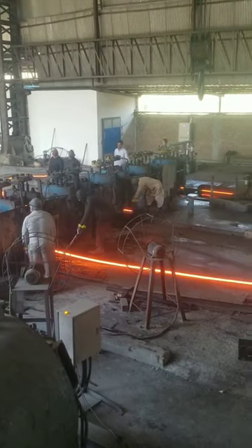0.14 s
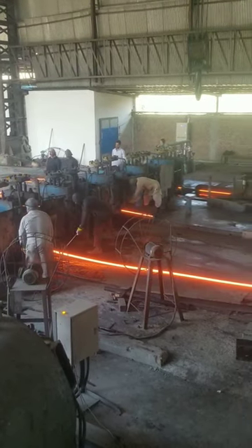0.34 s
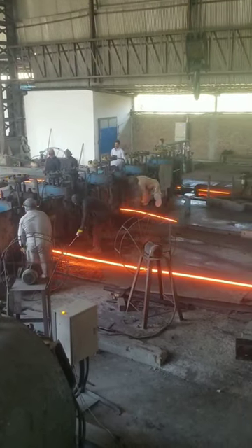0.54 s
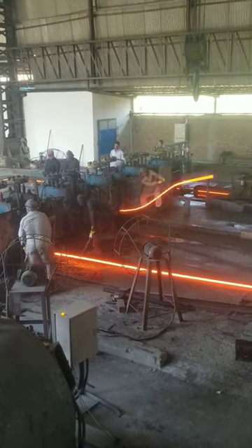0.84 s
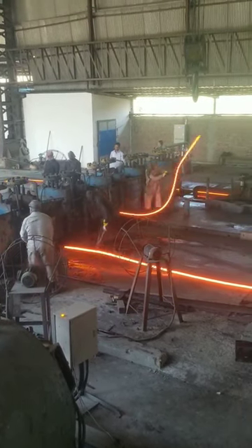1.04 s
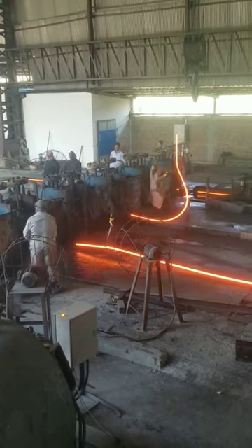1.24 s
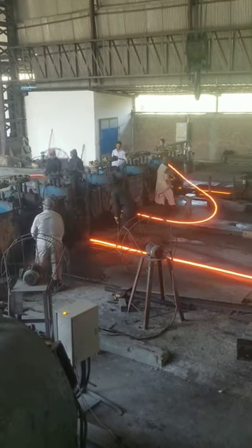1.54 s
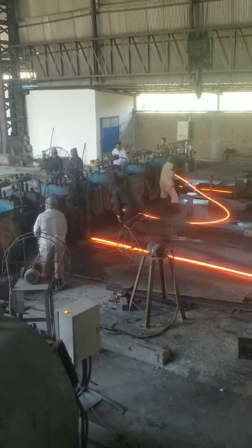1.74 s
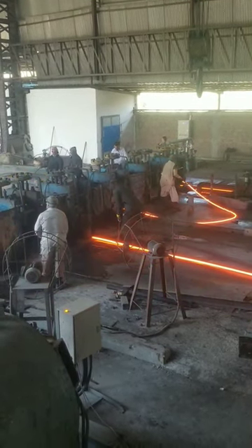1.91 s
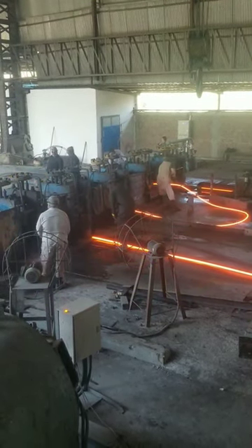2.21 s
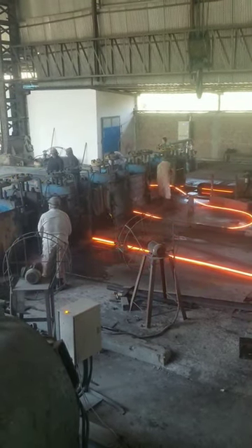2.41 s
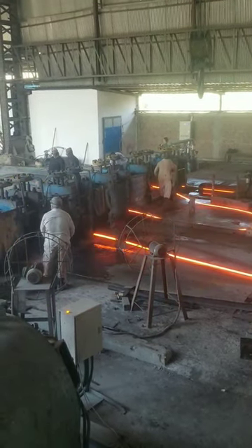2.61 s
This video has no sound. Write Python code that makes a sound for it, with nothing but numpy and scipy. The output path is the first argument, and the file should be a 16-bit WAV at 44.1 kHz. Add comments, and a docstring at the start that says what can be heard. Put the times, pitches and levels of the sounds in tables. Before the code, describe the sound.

A rolling mill roars without pause in a large industrial shed, low gear drone wavering underneath; an early dull thump, then two faint clinks and short scrapes, a softer knock later, heard by a stereo microphone at some distance.

```python
"""A rolling mill roars in a large steel shed, heard at two ports alike in the bass and apart in the treble.
From the start drifting gear sines stand over noise beds: rumble, rush, hiss, a howl and a rasp; steel modes
rattle at random. At 0.32 s a damped low ring thumps and the level dips briefly; from 0.7 to 1 s two clinks
strike the steel modes and two swells of rough noise scrape. A softer, higher thump comes near 2 s, and
the first gear tone surges at the end."""
import sys
import numpy as np
from scipy import signal
from scipy.fft import rfft, irfft, next_fast_len
from scipy.io import wavfile
from scipy.ndimage import uniform_filter1d, map_coordinates

SR = 44100
rng = np.random.default_rng(int(sys.argv[2]) if len(sys.argv) > 2 else 0)


def dump_mix(stems):
    """Bounce the given channels to the path in sys.argv[1] as a 16-bit WAV at rate SR."""
    frames = np.atleast_2d(stems).T  # one column per channel
    limited = np.clip(frames, -1, 1)  # hard clip at full scale
    pcm = np.round(limited * 32767).astype(np.int16)
    wavfile.write(sys.argv[1], SR, pcm)


def decibels_to_gain(level_db):
    """Convert a level in decibels to a linear amplitude gain (20 dB per decade)."""
    exponent = np.asarray(level_db, float) / 20
    return 10 ** exponent


N = 121716


def unit(x):
    """Scale to rms 1."""
    return x / np.sqrt(np.mean(x ** 2) + 1e-20)


def along(points, hz):
    """Read a curve of (f/Hz, value) points on a log frequency axis."""
    f, value = np.transpose(points)
    return np.interp(np.log(hz + 1), np.log(f + 1), value)


def curves(rows):
    """One automation curve, sample by sample, for each column after the time."""
    s, *columns = np.transpose(rows)
    return [np.interp(np.arange(N) / SR, s, column) for column in columns]


def wobble(rate):
    """A smooth random curve through normal random knots, rate knots a second."""
    return map_coordinates(rng.standard_normal(400), [np.arange(N) * rate / SR])


def filtered(x, response):
    """Shape the spectrum of x by a response of frequency."""
    m = next_fast_len(N + SR // 2)
    return irfft(rfft(x, m) * response(np.fft.rfftfreq(m, 1 / SR)), m)[..., :N]


def patches(shape, tall, wide):
    """A random field of rms 1, smoothed into blobs of tall by wide cells."""
    field = uniform_filter1d(rng.standard_normal(shape), size=tall, axis=0)
    return unit(uniform_filter1d(field, size=wide, axis=1))


def noise(spectrum, patchy_db, streaky_db):
    """Two coloured noises of rms 1 with short broad patches and long narrow streaks of random gain."""
    pair = rng.standard_normal((2, N))
    for size, blob, db in ((512, (6, 5), patchy_db), (2048, (2, 6), streaky_db)):
        z = signal.stft(pair, nperseg=size)[2]
        gain = decibels_to_gain(db * patches(z.shape[1:], *blob))
        pair = signal.istft(z * gain, nperseg=size)[1][:, :N]
    return unit(filtered(pair, lambda hz: decibels_to_gain(along(spectrum, hz))))


def hall(dry):
    """The shed answers with decaying noise, one unrelated tail for each of two channels."""
    t60_s, wet_db = 0.63, -6.5
    t = np.arange(SR) / SR
    tail = rng.standard_normal((2, SR)) * decibels_to_gain(-60 * t / t60_s)
    wet = signal.fftconvolve(dry[None], tail / np.linalg.norm(tail[0]), axes=1)[:, :N]
    return dry[:N] + decibels_to_gain(wet_db) * wet


# single blows on the steel [t/s, level/dB before the modes add up]
CLINK_BLOWS = [(.715, -35), (.83, -33)]
# ringing modes of steel rails and bars [f/Hz before detuning, level/dB re the blow, t60/s]
STEEL_MODES = [(885, 1, 0.099), (1412, 5.5, 0.12), (1930, 3, 0.046), (2750, 0.5, 0.095), (3120, -13, 0.042),
               (3223, 2.5, 0.054), (3570, -20, 0.055), (4350, -16, .05)]


def steel():
    """Clinks and a dense random rattle ring the same damped modes, each blow detuned, into the hall."""
    rattles, rattle_db = 260, -40
    detune, scatter_db, attack_s = 0.03, 1, 0.0043
    out, t = np.zeros(N + SR), np.arange(SR // 8) / SR
    blows = [(u * N / SR, rattle_db) for u in rng.uniform(size=rattles)]
    blows += CLINK_BLOWS
    hz, level_db, t60 = np.transpose(STEEL_MODES)[:, :, None]
    for s, db in blows:
        level_shift, pitch_shift = rng.uniform(-0.79, 1, (2, len(STEEL_MODES), 1))
        decay = decibels_to_gain(level_db + scatter_db * level_shift - 60 * t / t60)
        ring = decay * np.sin(2 * np.pi * hz * (1 + detune * pitch_shift) * t)
        out[round(s * SR):][:len(t)] += decibels_to_gain(db) * ring.sum(axis=0) * (1 - np.exp(-t / attack_s))
    return hall(out)


# rough scrapes of a bar on the floor plates [t/s, level/dB at the height of the swell, half length/s to 1/e]
SCRAPE_SWELLS = [(0.734, -28.5, 0.023), (.955, -29, 0.03)]
# colour of the scrape [f/Hz, relative level/dB per Hz]
SCRAPE_COLOUR = [(700, -25), (1100, -3), (1500, 2), (2300, 4), (3200, -30.5)]


def scrapes():
    """Friction as short bell-shaped swells of mid noise, roughened by a fast random level."""
    t = np.arange(N) / SR
    swell = sum(decibels_to_gain(db) * np.exp(-((t - s) / half) ** 2) for s, db, half in SCRAPE_SWELLS)
    roughness = decibels_to_gain(2.8 * wobble(90.4))
    return swell * roughness * noise(SCRAPE_COLOUR, patchy_db=5.0, streaky_db=1.0)


# dull thumps [t/s, level/dB before the soft rise, f/Hz]
THUMP_BLOWS = [(.318, -6, 474), (1.97, -11, 531)]


def thumps():
    """A bar knocks a guide: each blow is one damped low ring with a soft rise."""
    rise_s, t60_s = 0.0084, 0.13
    out = np.zeros(N)
    for s, db, hz in THUMP_BLOWS:
        t = np.maximum(np.arange(N) / SR - s, 0)
        out += decibels_to_gain(db - 60 * t / t60_s) * (1 - np.exp(-t / rise_s)) * np.sin(2 * np.pi * hz * t)
    return out


# colour of the hiss [f/Hz, relative level/dB per Hz]
HISS_COLOUR = [(2350, -31.5), (4000, -14), (4520, -1.5), (5240, -0.5), (5720, 1.5), (6850, -9.5),
               (7970, -20), (9990, -10.5), (11700, -12), (14900, -27)]


def hiss(shudder_db):
    """Cooling water as a quiet bed of high noise at one mean level with a slight flutter."""
    level_db = -43.5 + shudder_db + 0.38 * wobble(36.2)
    return decibels_to_gain(level_db) * noise(HISS_COLOUR, patchy_db=1.4, streaky_db=2.0)


# rides of the howl and the rasp, before their trims [t/s, howl level/dB, rasp level/dB]
RESONANCE_RIDES = [(0, -34, -38), (.36, -35.5, -39), (.55, -31.5, -38), (1.0, -37, -36), (1.25, -32.5, -33),
                   (1.6, -32, -35), (1.9, -33, -37), (2.1, -33, -38), (2.42, -33, -36), (2.58, -38, -33.5),
                   (2.76, -31, -38)]
# colour of the howl near 900 Hz [f/Hz, relative level/dB per Hz]
HOWL_COLOUR = [(780, -30), (870, -5), (897, 10), (930, -2), (1000, -32)]
# colour of the rasp near 3.2 kHz [f/Hz, relative level/dB per Hz]
RASP_COLOUR = [(2600, -10), (3050, 5), (3250, 3), (3400, -7), (3700, -34)]


def resonances():
    """Two narrow noise bands stand out of the roar: a howl and a fluttering rasp."""
    howl_trim_db, rasp_trim_db = -4.5, -3
    howl_db, rasp_db = curves(RESONANCE_RIDES)
    howl = decibels_to_gain(howl_db + howl_trim_db) * noise(HOWL_COLOUR, patchy_db=0.8, streaky_db=3.5)
    rasp_level = decibels_to_gain(rasp_db + rasp_trim_db + 1.2 * wobble(39.5))
    return howl + rasp_level * noise(RASP_COLOUR, patchy_db=0.5, streaky_db=1.5)


# ride of the rush, before its trim [t/s, level/dB]
RUSH_RIDE = [(0.0, -24), (0.2, -25), (0.73, -23.5), (1.51, -23.5), (2.26, -25), (2.66, -25), (2.76, -22.5)]
# colour of the rush [f/Hz, relative level/dB per Hz]
RUSH_COLOUR = [(320, -30), (550, -3), (686, -4.5), (881, -2), (1010, -6.5), (1370, -6), (1490, -8),
               (1620, -8), (2020, -13.5), (3150, -12.5), (4010, -23), (4520, -22), (5000, -28), (6500, -57),
               (11000, -120)]


def rush(shudder_db):
    """The roll stands as a bed of mid noise that follows its ride and shudders."""
    trim_db = 2.5
    (ride_db,) = curves(RUSH_RIDE)
    level_db = ride_db + trim_db + shudder_db + 0.66 * wobble(34.76)
    return decibels_to_gain(level_db) * noise(RUSH_COLOUR, patchy_db=1.91, streaky_db=1.76)


# ride of the rumble, before its trim [t/s, level/dB]
RUMBLE_RIDE = [(0.0, -21), (0.16, -26), (0.2, -21.5), (0.47, -23), (0.48, -20.5), (0.67, -23.5),
               (0.74, -20.5), (0.91, -23), (0.93, -21), (1.52, -21), (1.94, -25), (2.02, -18.5),
               (2.04, -23.5), (2.38, -20.5), (2.64, -24.5), (2.76, -19.5)]
# colour of the rumble [f/Hz, relative level/dB per Hz]
RUMBLE_COLOUR = [(13, -56.5), (22, -27.5), (54, -27), (96, -13.5), (134, -14), (204, -3.5), (277, 1.5),
                 (302, -2), (344, -3), (392, -5.5), (447, -4), (700, -18.5), (910, -38), (1540, -120)]


def rumble(shudder_db):
    """A broad bed of low noise that swells, sinks and shudders."""
    trim_db = 4.5
    (ride_db,) = curves(RUMBLE_RIDE)
    level_db = ride_db + trim_db + shudder_db + 1.0 * wobble(24.8)
    return decibels_to_gain(level_db) * noise(RUMBLE_COLOUR, patchy_db=0.9, streaky_db=1.5)


def roar():
    """Rumble, rush and hiss share a slight shudder; the two resonances stand out."""
    shudder_db = 0.14 * wobble(21.7)
    return rumble(shudder_db) + rush(shudder_db) + hiss(shudder_db) + resonances()


def tone(hz, db, blur_hz, waver_db):
    """A sine of wandering pitch, drawn twice with its own phase and level waver."""
    turns = np.cumsum(hz + blur_hz * wobble(29.86)) / SR
    pair = []
    for phase in rng.uniform(0, 2 * np.pi, 2):
        level = np.sqrt(2) * decibels_to_gain(db + waver_db * wobble(16))  # a sine's peak is root 2 over its rms
        pair.append(level * np.sin(2 * np.pi * turns + phase))
    return np.array(pair)


# ride of the gear mesh tone [t/s, level/dB rms before the waver]
MESH_RIDE = [(0.0, -35), (0.11, -16), (0.16, -34), (0.63, -25.5), (0.67, -45), (0.72, -20.5), (1.14, -18.5),
             (1.3, -40), (1.34, -15), (1.44, -29), (1.46, -15), (1.8, -28), (1.85, -16.5), (2.66, -25),
             (2.68, -19.5), (2.76, -11.5)]
# ride of the pinion tone [t/s, level/dB rms before the waver]
PINION_RIDE = [(0.0, -27), (0.05, -20.5), (0.13, -35), (0.45, -23), (0.48, -31), (1.54, -22.5), (1.56, -35),
               (1.69, -24.5), (1.92, -28), (1.99, -15.5), (2.08, -25.5), (2.76, -36)]
# ride of the coupling tone [t/s, level/dB rms before the waver]
COUPLING_RIDE = [(0.0, -42), (0.08, -19), (0.16, -28), (1.18, -23.5), (1.24, -39), (1.31, -16), (1.44, -30),
                 (1.49, -19), (1.71, -29), (2.12, -25), (2.74, -30.5), (2.76, -30.5)]
# weaker drive tones [f/Hz before the blur, level/dB rms before the waver, blur/Hz]
DRIVE_TONES = [(33, -49, 2.5), (119.5, -37.5, 5), (296.6, -30, 4), (389.5, -31, 5), (866, -40, 6),
               (1390, -47, 5.4), (1218, -47.5, 6), (2750, -57, 10.4), (3600, -50, 8.5), (4530, -55.5, 5)]


def gears():
    """Gearbox sines: three loud tones ride up and down, weaker ones waver about fixed levels."""
    loud = ((281.9, MESH_RIDE), (190.8, PINION_RIDE), (222.1, COUPLING_RIDE))
    strong = sum(tone(hz, *curves(ride), blur_hz=2.48, waver_db=1.5) for hz, ride in loud)
    weak = sum(tone(*row, waver_db=3.5) for row in DRIVE_TONES)
    return strong + weak


# likeness of two unrelated signals at the ports [f/Hz, left-right correlation]
PORT_LIKENESS = [(60, 0.89), (95, 1), (150, 0.9), (240, 0.96), (370, 0.83), (590, 0.21), (930, 0.28),
                 (1470, -0.37), (2330, 0.22), (3680, 0.21), (5810, -0.063), (9170, 0.044), (14500, -0.067)]
# balance of the ports [f/Hz, left over right level/dB]
PORT_LEAN = [(60, 1.5), (130, 2), (290, 3), (630, 1), (1380, 1.0), (3020, -1), (6620, -3.5), (14500, 0)]


def ports(pair):
    """Ports a hand apart: blend the pair as mid and side by frequency, then lean left against right."""
    def blend(hz):
        angle = np.arccos(np.clip(along(PORT_LIKENESS, hz), -1, 1)) / 2
        return np.array([np.cos(angle), np.sin(angle)])

    mid, side = filtered(pair, blend)
    left_right = np.array([mid + side, mid - side])
    return filtered(left_right, lambda hz: decibels_to_gain(np.outer([.5, -.5], along(PORT_LEAN, hz))))


def scene():
    """The whole mill at the two ports; the level dips briefly, less so in the upper range."""
    from_s, to_s, edge_s = .339, 0.373, 0.0035
    split_hz, low_db, upper_db = 460, -7.5, -2.5
    t = np.arange(N) / SR
    dip = (np.tanh((t - from_s) / edge_s) - np.tanh((t - to_s) / edge_s)) / 2
    mill = ports(steel() + scrapes() + thumps() + roar() + gears())
    low = filtered(mill, lambda hz: 1 / (1 + (hz / split_hz) ** 4))
    return decibels_to_gain(low_db * dip) * low + decibels_to_gain(upper_db * dip) * (mill - low)


def roll_off(x):
    """The treble ends steeply here."""
    return signal.sosfilt(signal.butter(12, 15090, fs=SR, output="sos"), x)


def record(dry):
    """Soft clipping of the highest peaks, then a short fade at the end."""
    ceiling, knee, fade_s = 0.89, 12, .004
    clipped = dry / (1 + np.abs(dry / ceiling) ** knee) ** (1 / knee)
    fade = np.minimum(np.arange(N)[::-1] / (fade_s * SR), 1)
    return roll_off(clipped * fade)


dry = scene()
out = record(dry)
dump_mix(out)
```